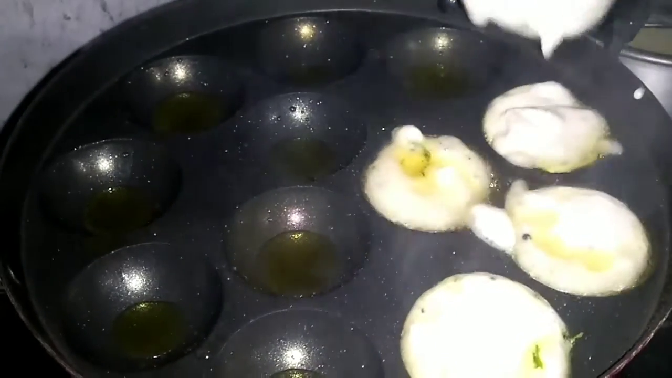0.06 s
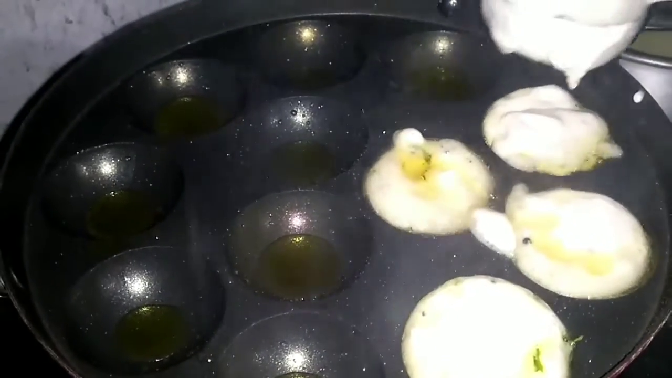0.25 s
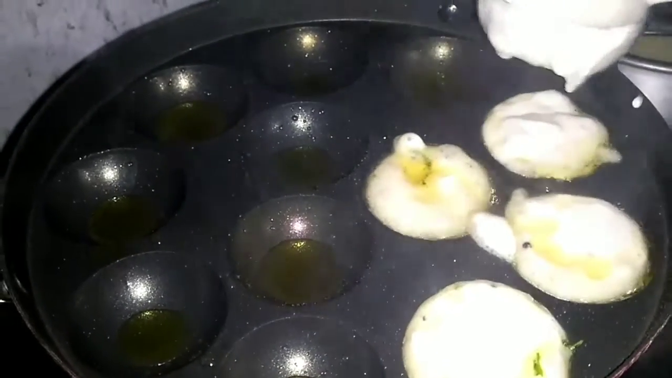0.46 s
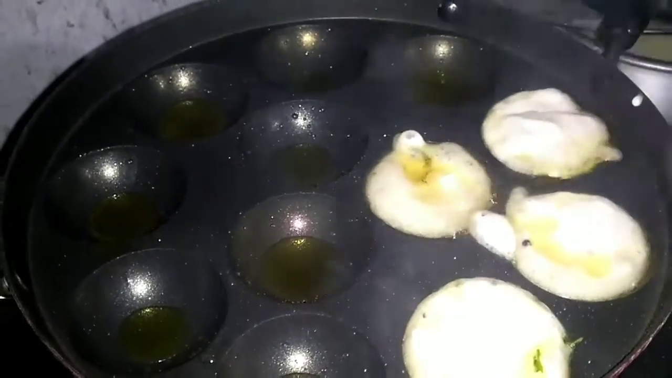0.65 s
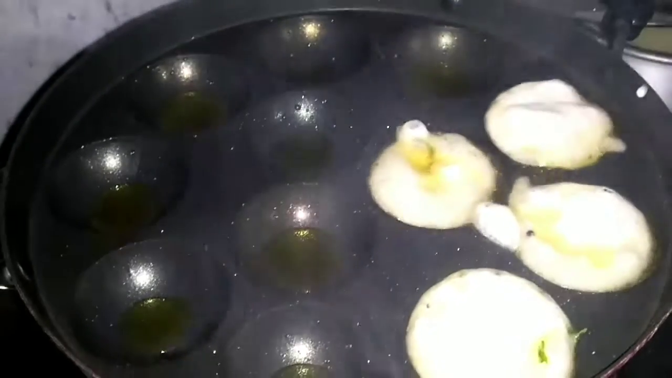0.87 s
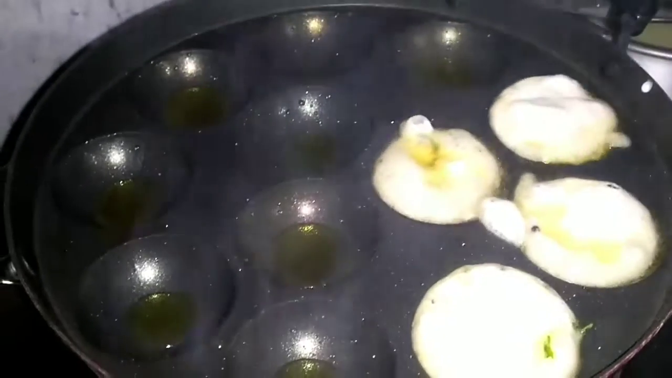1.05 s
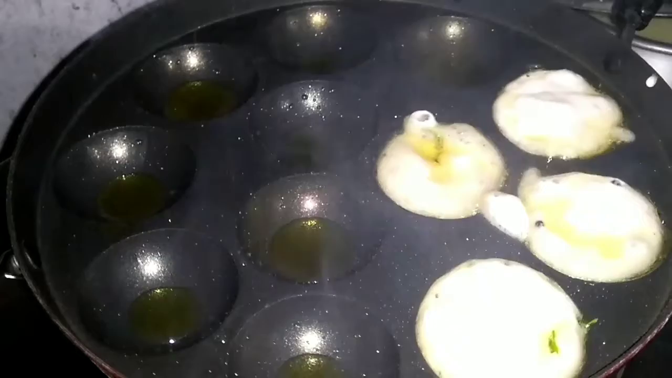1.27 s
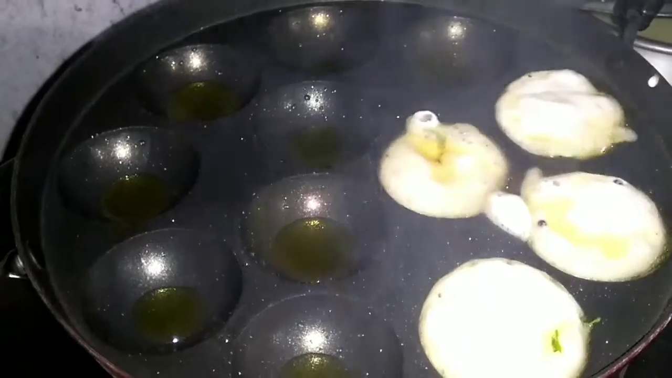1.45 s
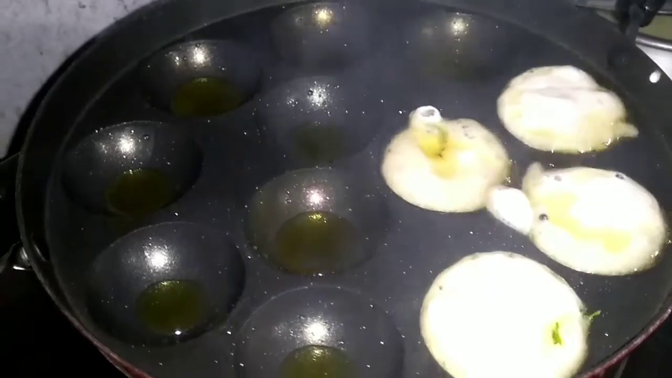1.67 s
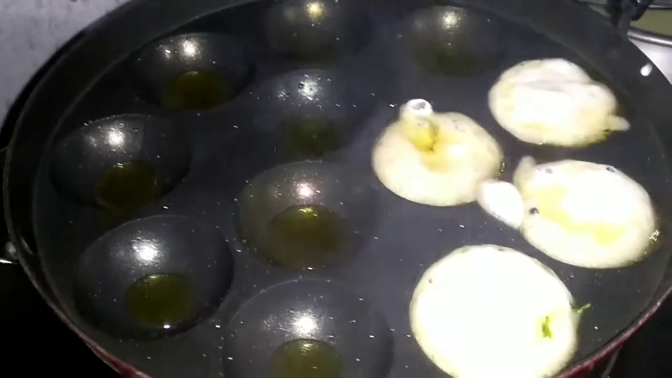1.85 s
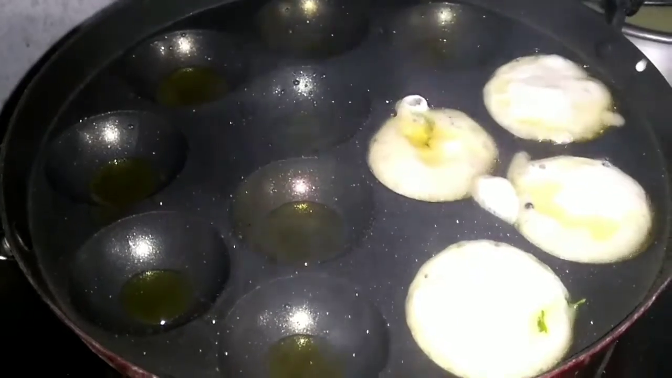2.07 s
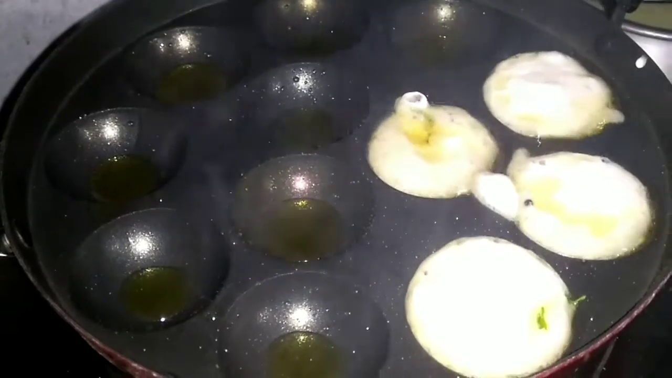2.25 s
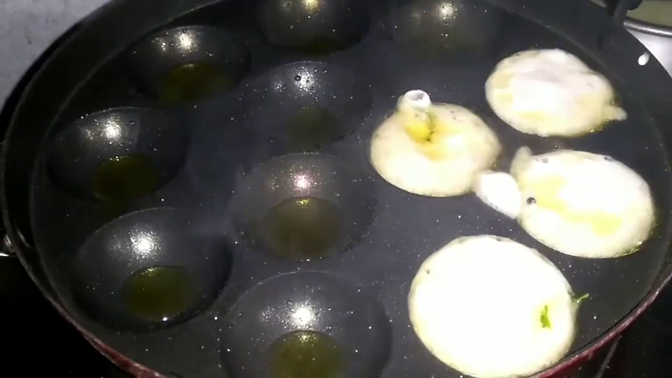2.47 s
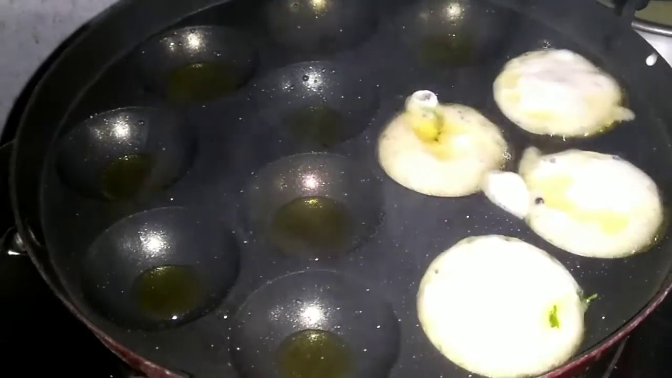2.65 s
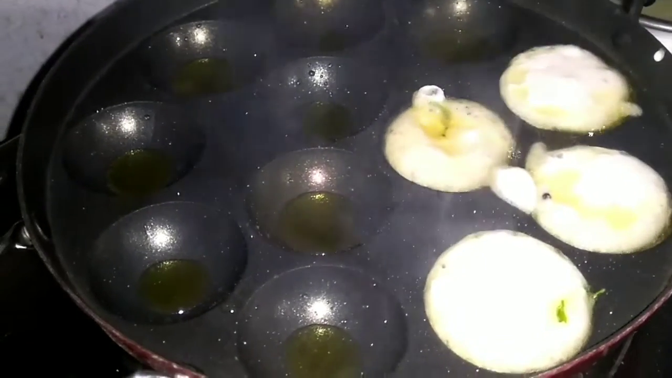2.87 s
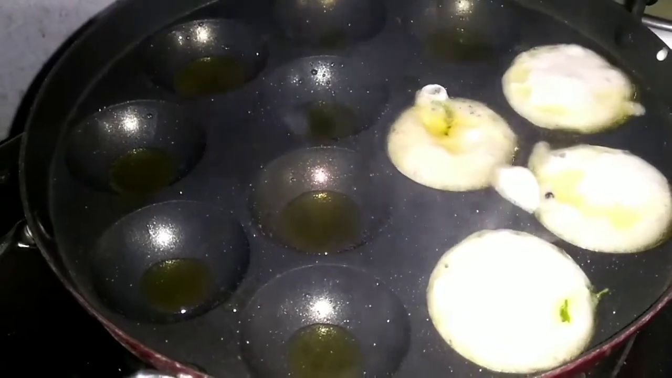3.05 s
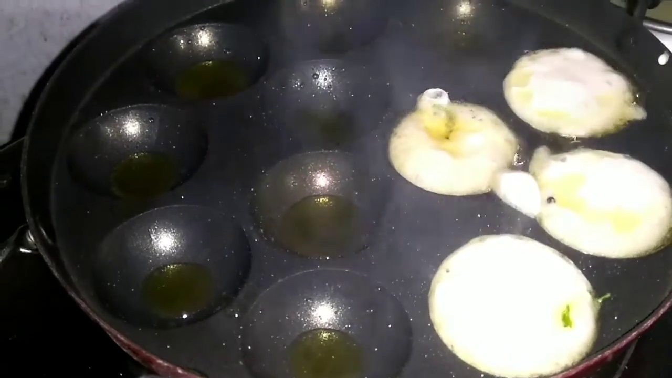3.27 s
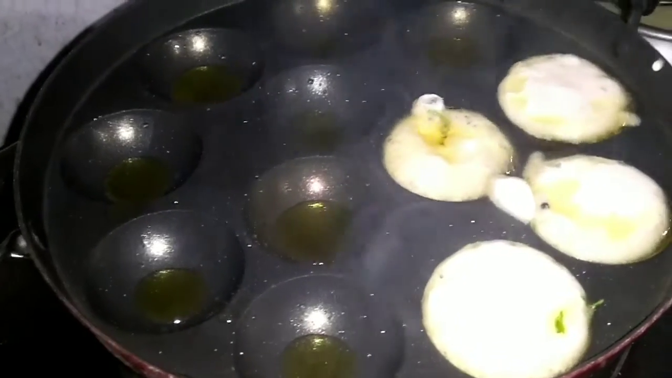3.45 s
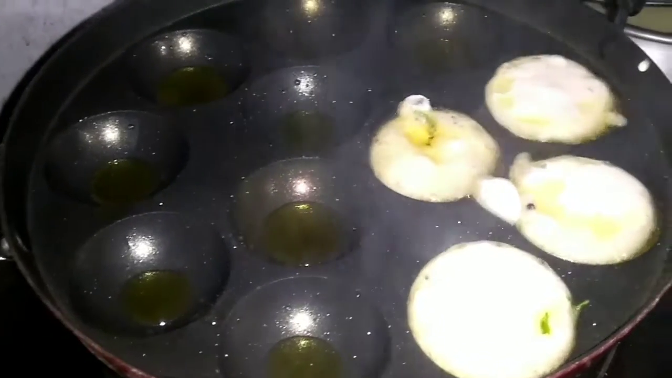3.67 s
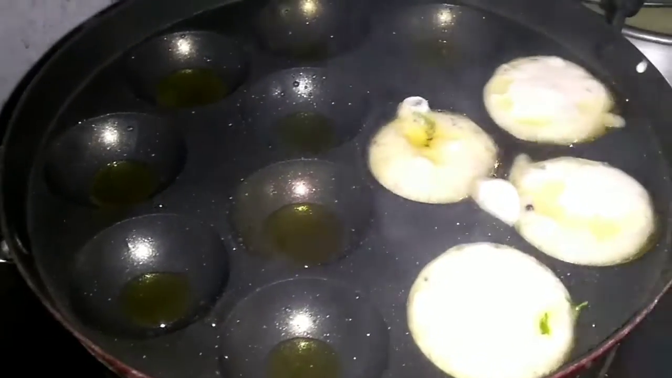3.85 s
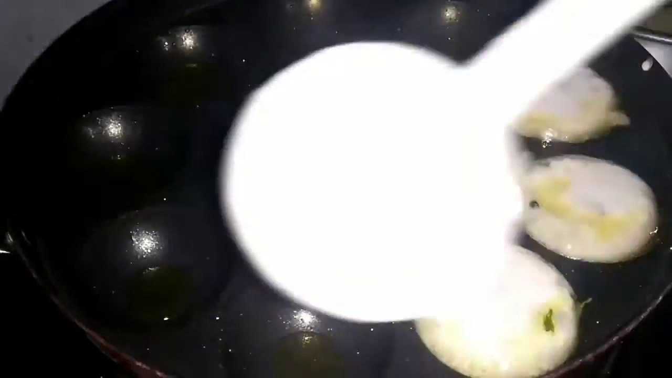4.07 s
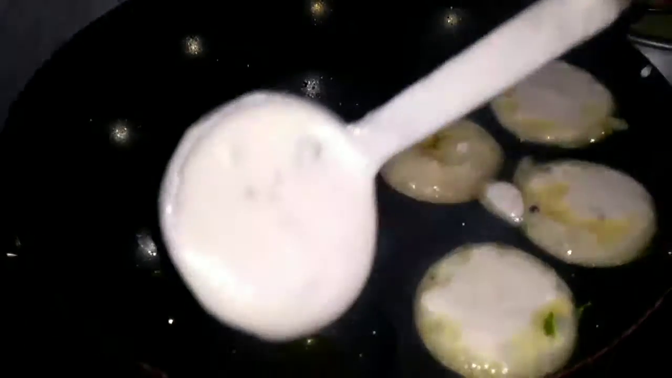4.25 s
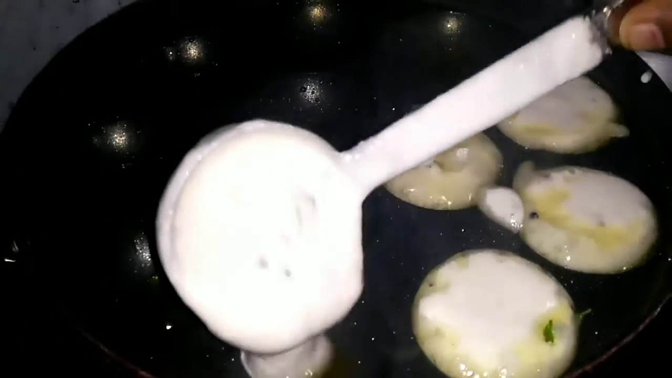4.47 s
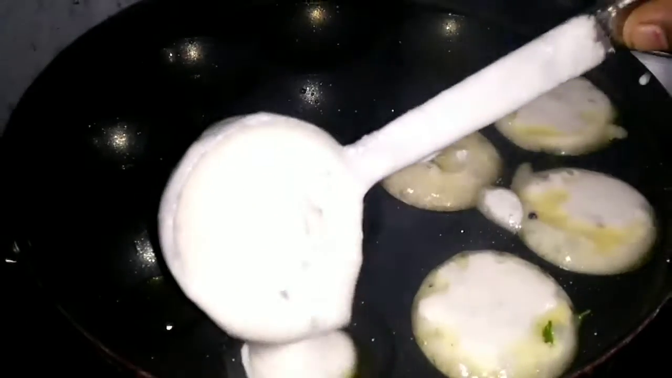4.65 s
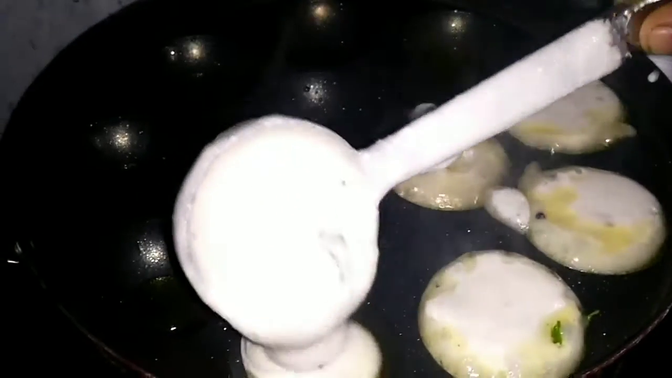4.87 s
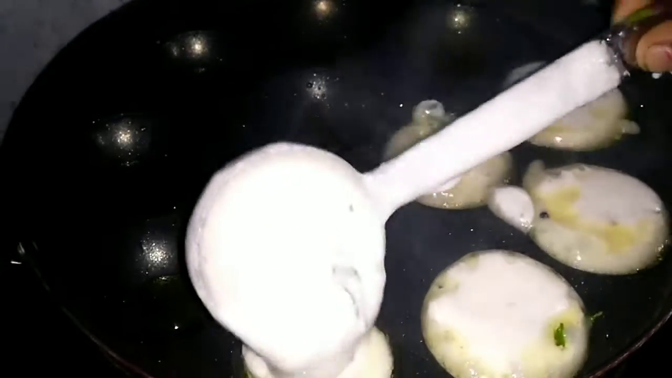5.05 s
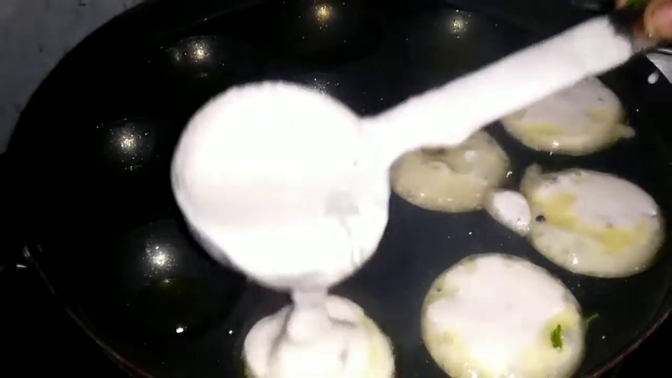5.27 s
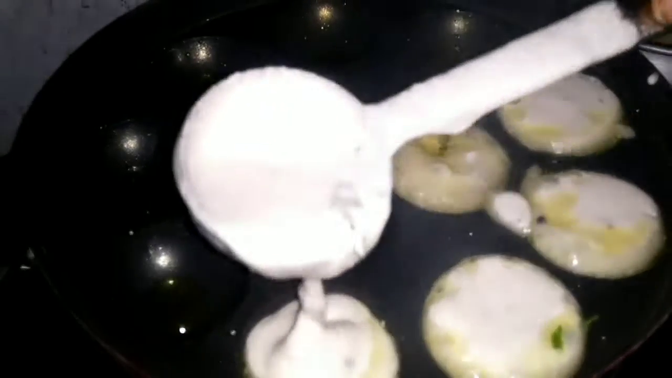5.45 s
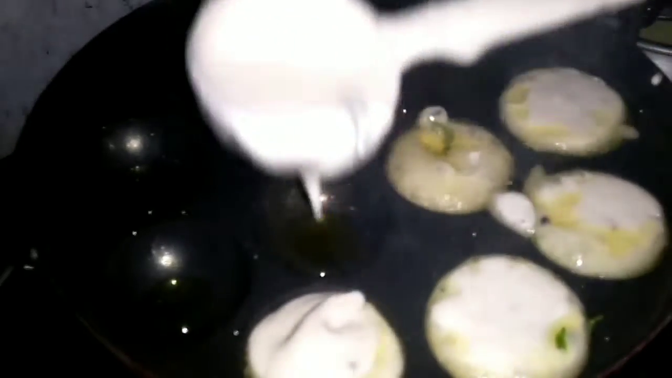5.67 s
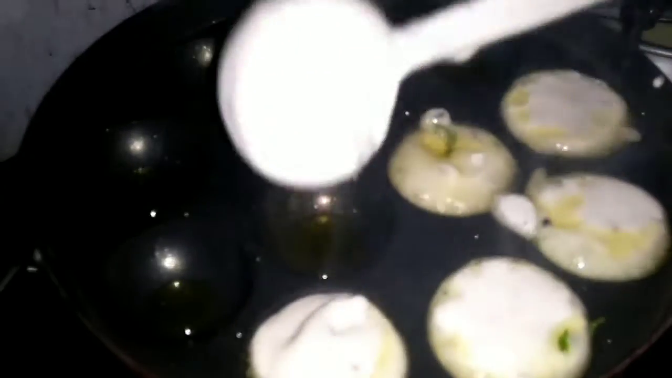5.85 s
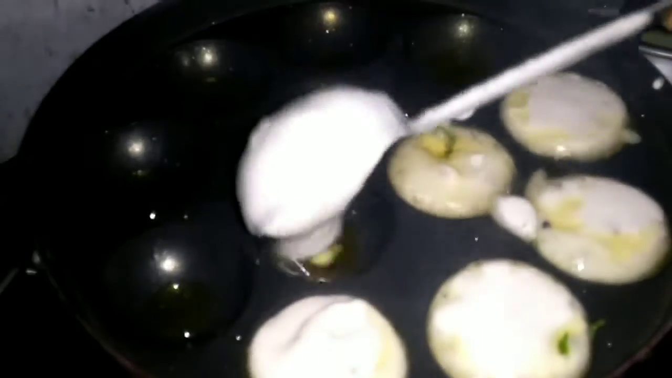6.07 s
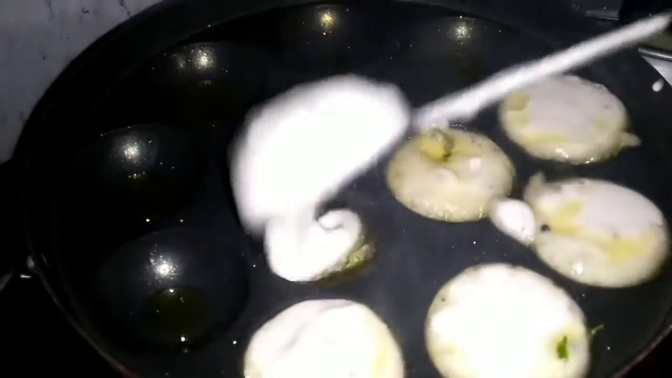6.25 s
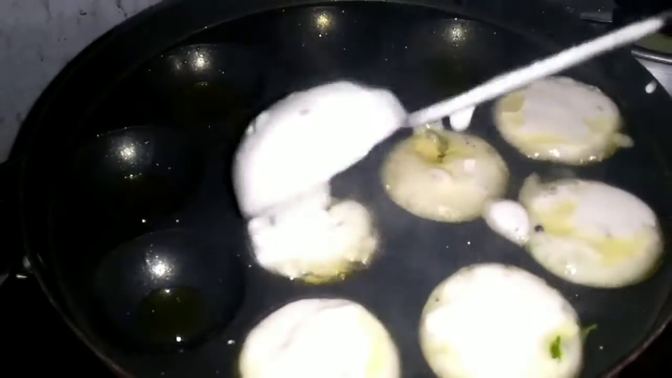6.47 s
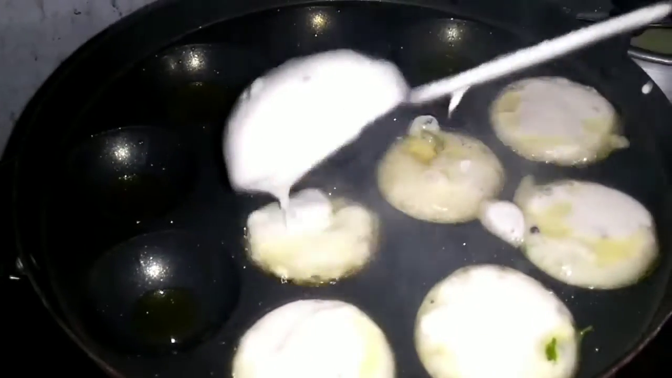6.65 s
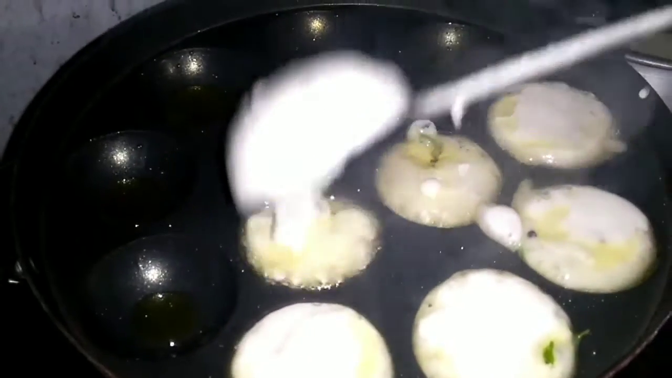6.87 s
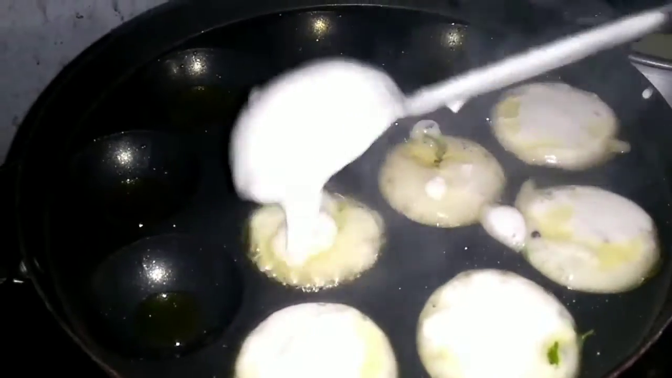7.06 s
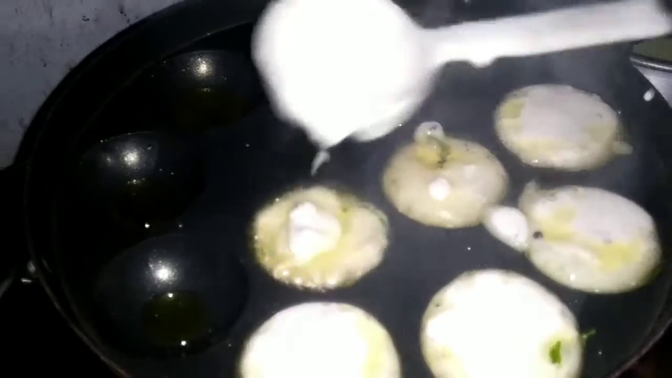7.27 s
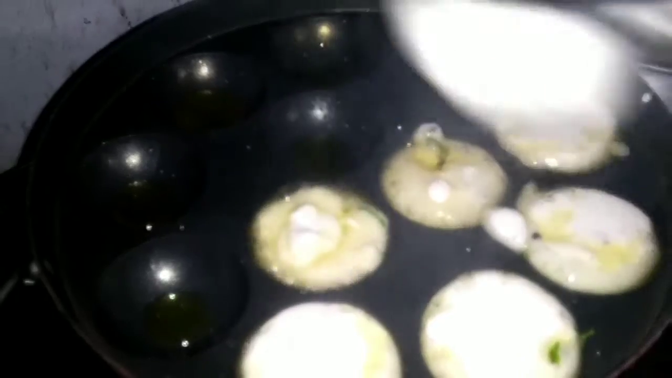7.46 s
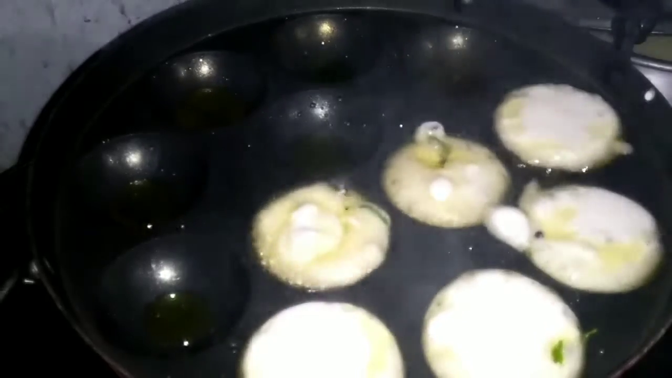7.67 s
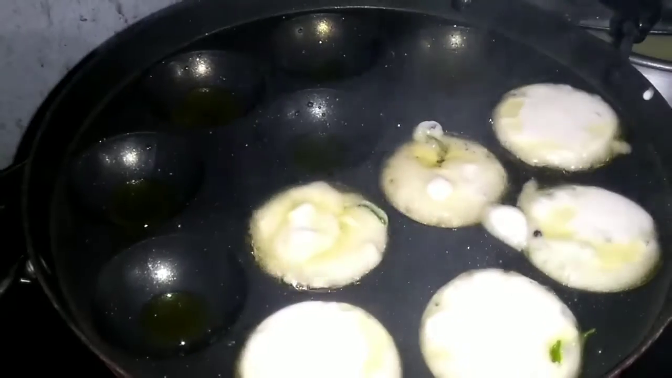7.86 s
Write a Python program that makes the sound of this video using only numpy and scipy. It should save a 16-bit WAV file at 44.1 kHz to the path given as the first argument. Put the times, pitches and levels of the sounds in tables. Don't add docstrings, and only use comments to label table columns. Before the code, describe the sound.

A close stereo scene in a small, hard-walled kitchen. From the start a thin, quiet sizzle simmers over a faint burner hum, dotted with fine spits and bright clicks. A dull, low bowl knock lands at 0.9 seconds, then a stronger cluster of thuds and shifting bumps from 1.7 to 2.1, with soft ladle drag. Another double knock comes near 2.55, just after a sharp flurry of pops at 2.4. From 3 to 4.8 only sparse spits and ticks stand out over weak frying. Around 4.92 and again at 5.17, the ladle chatters on the rim in short, damped metallic clacks, with a spit between. At 6.0 to 6.2 fresh batter hits oil: spits swell into a loud, bright, fluttering hiss with hard cracks, strongest from 6.25 to 7.2. It drops abruptly around 7.3 to a modest simmer, with one soft thud near 7.9.

```python
import sys
import numpy as np
from scipy import signal
from scipy.fft import rfft, irfft, next_fast_len
from scipy.io import wavfile
from scipy.ndimage import uniform_filter1d, map_coordinates

SR = 44100
rng = np.random.default_rng(int(sys.argv[2]) if len(sys.argv) > 2 else 0)


def generate_wav(signal):
    frames = np.transpose(np.atleast_2d(signal))
    scaled = np.clip(frames, -1, 1) * 32767
    pcm = np.round(scaled).astype(np.int16)
    wavfile.write(sys.argv[1], SR, pcm)


def invert_db(level):
    return 10 ** (np.asarray(level, dtype=float) / 20)


N = 349272
LAG = 10

# f/Hz, density/dB per Hz
FINE_STEAM = [(2000, -100), (5000, -46), (7000, -3), (8200, -2), (10400, 0), (12500, -2.5), (14400, -8.5),
              (15700, -2.5)]


def unit(x):
    return x / np.sqrt(np.mean(x ** 2) + 1e-20)


def along(points, hz):
    f, v = np.transpose(points)
    return np.interp(np.log(hz + 1), np.log(f + 1), v)


def wobble(rate):
    knots = rng.standard_normal(int(N * rate / SR) + 4)
    return map_coordinates(knots, [np.arange(N) * rate / SR])


def filtered(x, response):
    n = x.shape[-1]
    m = next_fast_len(n + 2048)
    hz = np.fft.rfftfreq(m, 1 / SR)
    return irfft(rfft(x, m) * response(hz), m)[..., :n]


def patchy(x, depth_db):
    z = signal.stft(x, nperseg=512)[2]
    field = rng.standard_normal(z.shape[1:])
    field = uniform_filter1d(uniform_filter1d(field, 8, 0), 6, 1)
    return signal.istft(z * invert_db(depth_db * unit(field)), nperseg=512)[1][:, :N]


def crackle(n, rate, spiky_db, haze):
    draw = rng.random((int(n * rate / SR) + 2, 4))
    at = (draw[:, 0] * n).astype(int)
    rank = np.minimum(-np.log(1 - draw[:, 1]), 5)
    size = invert_db(spiky_db * rank) * np.sign(draw[:, 2] - 0.5)
    lag = (2 * LAG * draw[:, 3]).astype(int)
    left = np.bincount(at + lag, size, n + 2 * LAG)[:n]
    right = np.bincount(at, size, n)
    bursts = unit(np.array([left, right]))
    return unit(bursts + haze * rng.standard_normal((2, n)))


def airy(spectrum):
    # f/Hz, left-right coherence
    alike = [(60, 0.99), (300, 1), (800, 0.97), (1300, 0.95), (2000, 0.55), (3000, 0.091)]

    def split(hz):
        angle = np.arccos(np.clip(along(alike, hz), -1, 1)) / 2
        return invert_db(along(spectrum, hz)) * [np.cos(angle), np.sin(angle)]

    mid, side = filtered(rng.standard_normal((2, N)), split)
    return unit(np.array([np.roll(mid + side, LAG), mid - side]))


def summed(*levels_db):
    return 10 * np.log10(sum(invert_db(db) ** 2 for db in levels_db) + 1e-12)


def surging(k):
    # t/s, fine level/dB, coarse level/dB, length/s
    surges = [(6.18, -2, 2, .012), (6.217, 3, -6.5, 0.012), (6.27, 0, 1.5, 0.016), (6.295, 4, 1.5, 0.014),
              (6.353, -4, -0.5, 0.013), (6.39, 2.5, 1, 0.038), (6.447, -2.5, -0.5, 0.025),
              (6.501, 1, -2.5, 0.023), (6.556, -2.5, -1, 0.019), (6.615, 2, 3.5, .02),
              (6.646, -1.5, 0, 0.0097), (6.709, -2, -2.5, 0.018), (6.749, 1, 3, 0.022),
              (6.813, 2, 3.5, 0.012), (6.85, 3, -1.5, 0.011), (6.934, 3.5, -2, 0.0078),
              (6.973, -3, 1, 0.015), (7.033, 0.5, 2, 0.034), (7.064, -2.5, -2, 0.014),
              (7.095, 1.5, 1, 0.018), (7.134, -1, 0, 0.0076), (7.183, 2.5, 2, 0.03), (7.24, -1, -1, 0.016)]
    t = np.arange(N) / SR
    return sum(row[1 + k] * np.exp(-((t - row[0]) / row[3]) ** 2) for row in surges)


def boiling():
    # t/s, level/dB
    simmer = [(0.0, -49), (1.19, -51.5), (1.54, -52), (1.98, -51), (2.27, -54.5), (2.6, -53), (2.76, -60.5),
              (3.24, -56), (4.01, -58.5), (4.28, -64), (4.41, -57), (4.87, -63), (5.01, -49.5),
              (5.25, -58.5), (5.84, -53.5), (6.0, -87), (7.3, -45), (7.92, -49.5)]
    # t/s, boiling time/s, fine level/dB, coarse level/dB
    pours = [
        (4.26, 0.6, -78, -54.5),
        (5.981, 0.99, -25.5, -34),
    ]
    spread_s, quench_s = (0.28, 0.26), (0.075, 0.16)
    first_db, last_db = (-59, -24), (-12.5, -12)
    wet_s, drying_db_per_s = 0.64, (4.5, 21)

    t = np.arange(N) / SR
    simmer_db = np.interp(t, *np.transpose(simmer))
    layers = [[simmer_db], [simmer_db - 5]]
    for s, hold, *peaks_db in pours:
        for k, db in enumerate(peaks_db):
            full = s + spread_s[k]
            sag_db = drying_db_per_s[k] * np.clip(t - full - wet_s, 0, None)
            times = [s, full, full + hold, full + hold + quench_s[k]]
            shape_db = np.interp(t, times, [first_db[k], 0, 0, last_db[k]], -99, -99)
            layers[k].append(db + shape_db - sag_db + surging(k))
    return summed(*layers[0]), summed(*layers[1])


def frying():
    # f/Hz, density/dB per Hz
    simmering = [(700, -13.5), (1100, -6.5), (1600, -8), (2200, -7), (3000, -1.5), (4200, 1.5), (5500, 0),
                 (7000, -3), (9000, -6.5)]
    # f/Hz, density/dB per Hz
    roaring = [(200, -95), (500, -50), (880, -32), (1000, -17.5), (1500, -12), (2200, -16), (3200, -7),
               (4500, -2.5), (6000, 0.5), (7200, -1.5), (9000, -18)]
    # f/Hz, width/Hz, level/dB
    pan_modes = [(1036, 43, 11.5), (1151.5, 26, 13), (1260, 38, 3.5), (1391, 28, 9), (1600, 38, 8.5),
                 (1790, 41, 11.5), (2033, 140, 7), (2233, 82, 8.5), (2406, 46, 10.5), (2640, 36, 11.5),
                 (2880, 28, 9), (3350, 140, 8.5), (4540, 80, -3), (4400, 150, 3)]

    fine_db, coarse_db = boiling()
    heat = np.clip((fine_db + 50.5) / 12, 0, 1)
    seethe_db = (1 - 0.9 * heat) * 1.1 * wobble(16) + (0.9 - 0.4 * heat) * wobble(60)
    fine = patchy(crackle(N, 7000, spiky_db=3.3, haze=1.2), 1.2)
    fine = unit(filtered(fine, lambda hz: invert_db(along(FINE_STEAM, hz))))
    bubbles = patchy(crackle(N, 2600, spiky_db=2.9, haze=1.0), 2.4)

    def through_pan(spectrum):
        def response(hz):
            rings_db = sum(db / (1 + ((hz - c) / w) ** 2 * 4) for c, w, db in pan_modes)
            return invert_db(along(spectrum, hz) + rings_db)
        return unit(filtered(bubbles, response))

    coarse = (1 - heat) * through_pan(simmering) + heat * through_pan(roaring)
    fine_flutter_db = 0.76 * (1 - 0.6 * heat) * wobble(30)
    coarse_flutter_db = 0.8 * (1 - 0.5 * heat) * wobble(25)
    hiss = invert_db(fine_db + 2.5 + seethe_db + fine_flutter_db) * fine
    return hiss + invert_db(coarse_db + 2.0 + seethe_db + coarse_flutter_db) * coarse


def stirring(idle_db):
    # t/s, length/s, peak level/dB
    strokes = [(-0.1, 0.54, -62), (0.623, 0.24, -62), (1.74, 0.19, -51), (1.843, 0.26, -52.5),
               (2.078, 0.11, -52), (2.357, 0.32, -61), (2.602, 0.26, -54.5), (3.998, 0.074, -64),
               (4.376, 0.27, -58.5), (4.514, 1.04, -56), (5.02, 0.11, -50), (5.17, 0.19, -42),
               (5.317, 0.48, -56.5), (5.682, 0.34, -56.5), (5.786, 1.56, -53.5), (7.04, 0.73, -57.5),
               (7.6, 0.4, -61)]
    t = np.arange(N) / SR
    power = invert_db(idle_db) ** 2
    for s, length, db in strokes:
        power = power + invert_db(db) ** 2 * np.sin(np.pi * np.clip((t - s) / length, 0, 1)) ** 2
    return 10 * np.log10(power)


def background():
    # f/Hz, density/dB per Hz
    hum = [(18, -50), (30, -30), (133, 7.5), (157, 8), (194, -7), (310, 5.5), (385, -13.5), (486, 4.5),
           (637, -25), (864, -49), (1020, 4), (1310, -41), (1910, -10), (2200, -3), (2860, -8.5),
           (4840, -120)]
    # f/Hz, density/dB per Hz
    drag_spectrum = [(110, -48), (180, -19), (318, -0.5), (441, -6.5), (482, -2), (699, 0), (858, -3),
                     (937, -10), (1500, -14), (1950, -4.5), (3300, -120)]
    # f/Hz, density/dB per Hz
    counter = [(20, -70), (40, -55), (55, -16), (120, -14.5), (170, -47), (400, -120)]

    idle_db = -66.5
    drag_db = stirring(idle_db)
    rumble_db = -81.5 + 0.31 * np.minimum(drag_db - idle_db, 20)
    lumps_db = 1.4 * wobble(22)
    drag = invert_db(drag_db - 5.5 + lumps_db) * patchy(airy(drag_spectrum), 2.2)
    rumble = invert_db(rumble_db + 3.0 + 2.1 * wobble(11.0)) * airy(counter)
    return invert_db(-68.5) * patchy(airy(hum), 2.4) + drag + rumble


def ring(modes, t, attack, spread):
    tones = 0
    for hz, db, t60 in modes:
        level_db = db + rng.normal(0, 1.3 * spread) - 60 * t / t60
        pitch = hz * rng.normal(1, 0.012 * spread)
        tones = tones + invert_db(level_db) * np.sin(2 * np.pi * pitch * t)
    return tones * (1 - np.exp(-t / attack))


def knocks():
    # t/s, peak level/dB, f/Hz, t60/s,
    # overtone level/dB
    thuds = [(0.024, -51, 303, 0.13, -1), (0.904, -18.5, 275, 0.04, -22), (0.917, -22.5, 278, 0.032, -25),
             (1.69, -27, 265, 0.079, -5), (1.7221, -16, 301, 0.024, -30), (1.801, -40, 274, 0.11, -9),
             (1.962, -41, 755, 0.057, -15), (1.97, -38, 548, 0.057, 0), (1.975, -42, 727, 0.034, -12),
             (2.009, -36.5, 695, 0.03, -15), (1.795, -41, 702, 0.057, -19), (1.84, -52, 295, 0.11, -15),
             (1.88, -50, 300, 0.14, -15), (1.86, -57, 677, 0.14, -19), (1.99, -44, 318, 0.094, -15),
             (2.114, -37, 296, 0.063, -14), (2.129, -43.5, 641, 0.081, -21), (2.418, -44, 695, 0.032, -17),
             (2.538, -23, 267, 0.064, 1), (2.571, -26.5, 242, 0.055, -14), (2.604, -35.5, 463, 0.069, -34),
             (2.619, -41, 496, 0.076, -26), (3.95, -41, 1150, 0.025, -30), (4.048, -50.5, 307.6, 0.32, -1),
             (4.12, -48, 277, 0.11, -21), (4.639, -53.5, 660, 0.3, -15), (5.328, -32, 320, 0.072, -16),
             (5.999, -37, 1142, 0.14, -23), (6.059, -43, 1114, 0.14, -23), (6.997, -47, 357, 0.15, -7),
             (7.884, -33, 235, 0.06, -19)]
    # t/s, peak level/dB, f/Hz
    bumps = [
        (1.728, -37.5, 156),
        (1.759, -38, 56.5),
        (1.789, -32.5, 78.5),
        (1.819, -59, 61.9),
        (2.59, -35, 161),
        (4.595, -47, 145),
        (4.738, -49, 118),
        (5.211, -36, 128),
    ]
    # ratio to f, level/dB, t60/s
    wall = [(1.9, 12, 0.02), (2.5, 1, 0.024), (3.4, 0, 0.012)]

    out, t = np.zeros(N + SR), np.arange(SR // 4) / SR
    for s, db, hz, t60, over_db in [*thuds, *[(*row, 0.094, -19) for row in bumps]]:
        modes = [(hz, 0, t60), (hz * 1.3, -6, t60), (hz * 0.85, -7, t60)]
        over_db = min(over_db, 3 - hz / 70)
        modes += [(hz * k, over_db + level, life) for k, level, life in wall]
        out[round(s * SR):][:len(t)] += invert_db(db - 0.5) * ring(modes, t, 2.2 / hz, spread=0.4)
    return out[:N]


def raps():
    # t/s, peak level/dB, ringing time/s, overtone level/dB, chatter share
    bounces = [(4.914, -46, 0.01, 6, .5), (4.9235, -19, 0.022, 5.5, 0.11), (4.936, -29.5, 0.008, -3, 0.17),
               (4.946, -22, 0.003, -6, 0.37), (4.957, -29.5, 0.0092, -6, 0.9),
               (4.971, -28.5, 0.011, -2, 0.9), (4.985, -37, 0.017, -4, 0.97), (5.005, -38.5, 0.016, -10, 1),
               (5.025, -44, 0.015, -9, 0.8), (5.1714, -22.5, 0.019, -3, 0.052),
               (5.181, -22.5, 0.006, 6, .1), (5.194, -29, 0.0039, 4, 0.36), (5.204, -40, 0.0099, -1, .8),
               (5.214, -33, 0.0081, 4, 0.93), (5.232, -34, 0.012, -2, 0.6), (5.248, -35, 0.018, -16, 0.37),
               (5.271, -49, 0.013, -9, 0.65), (5.295, -49, 0.025, -9, 0.54)]
    # f/Hz, level/dB, t60/s
    rim = [(272, -2, 0.077), (455, -7.5, 0.094), (565, -11.5, 0.09), (711, -3, 0.077), (813, 3, 0.079),
           (1001, 5.5, 0.077), (1150, -12, 0.08), (1230, -24, 0.073), (1553, -6, 0.074), (1680, -12, 0.091),
           (2030, -0.5, 0.083), (2360, -7.5, 0.047), (3170, -24, 0.054), (4180, -30, 0.045)]

    out, t = np.zeros(N + SR), np.arange(SR // 10) / SR
    for s, db, rings, over_db, chatter in bounces:
        contact = 0.16 * chatter * np.exp(-t / 0.014) * rng.standard_normal(len(t))
        contact[0] = 1
        modes = [(hz, level + over_db * (hz > 1200), t60) for hz, level, t60 in rim]
        clack = signal.fftconvolve(contact / np.linalg.norm(contact), ring(modes, t, 0.0009, spread=0.2))
        clack = clack[:len(t)] / np.abs(clack).max()
        scrape = filtered(rng.standard_normal(len(t)), lambda f: f / 600 / (1 + (f / 1300) ** 3))
        scuff = invert_db(-12 - 60 * t / 0.1) * unit(scrape)
        damped = np.exp(-np.clip(t - rings, 0, None) / 0.003)
        out[round(s * SR):][:len(t)] += invert_db(db - 6.0) * (3 * clack + scuff) * damped
    return filtered(out[:N], lambda hz: 1 / (1 + (150 / (hz + 1)) ** 4))


def kitchen(x):
    # f/Hz, t60/s
    decay = [(150, 0.29), (1000, 0.13), (4000, 0.28), (12000, 0.15)]
    hz, t, z = signal.stft(airy([(100, 0)])[:, :SR // 2], SR, nperseg=256)
    fading = invert_db(-60 * t / along(decay, hz)[:, None])
    tail = signal.istft(z * fading, SR, nperseg=256)[1]
    late = np.pad(x, (400, 0))[None]
    return signal.fftconvolve(late, tail / np.linalg.norm(tail[0]), axes=1)[:, :N]


def spits():
    # t/s, peak level/dB, centre f/Hz, length/s
    left_cups = [(0.598, -35, 9720, 0.025), (0.803, -41.5, 3180, 0.022), (1.168, -39, 4450, 0.013),
                 (1.677, -34.5, 8500, 0.01), (2.167, -38.5, 8800, 0.03), (2.347, -42.5, 2740, 0.021),
                 (2.444, -24.5, 2920, 0.0045), (2.614, -43, 10900, 0.11), (2.758, -43, 2740, 0.028),
                 (2.916, -40, 3920, 0.035), (3.125, -42, 3350, 0.014), (3.436, -39, 11400, 0.015),
                 (3.519, -36.5, 8350, 0.032), (3.576, -38.5, 9800, 0.017), (3.828, -36, 8400, 0.015),
                 (3.836, -38, 4400, 0.011), (3.897, -35, 4400, 0.019), (4.376, -43, 4480, 0.097),
                 (5.244, -41, 1990, 0.095), (5.519, -37, 5800, 0.022), (5.968, -23, 12700, 0.017)]
    # t/s, peak level/dB, centre f/Hz, length/s
    middle_cups = [(0.05, -39, 3880, 0.029), (0.196, -35.5, 9860, 0.043), (0.272, -35.5, 11600, 0.027),
                   (0.493, -43, 9740, 0.092), (0.714, -40.5, 2600, 0.04), (1.055, -34.5, 9000, 0.064),
                   (1.253, -34, 9100, 0.041), (1.847, -45.5, 2500, 0.2), (2.315, -41, 4600, 0.012),
                   (2.411, -40, 2500, 0.031), (2.536, -33.5, 10600, 0.015), (2.659, -47.5, 2740, 0.19),
                   (2.725, -40, 10500, 0.027), (3.009, -42, 12200, 0.025), (3.396, -46.5, 2960, 0.1),
                   (3.709, -38, 4040, 0.03), (3.944, -33, 12500, 0.0076), (4.232, -37.5, 5530, 0.02),
                   (4.285, -40.5, 11500, 0.022), (4.331, -40, 10300, 0.0099), (4.593, -36.5, 3560, 0.023),
                   (4.643, -37.5, 2880, 0.032), (4.723, -40, 2460, 0.034), (4.772, -40, 2300, 0.031),
                   (4.929, -30.5, 2450, 0.083), (4.899, -41, 5150, 0.089), (4.786, -47, 8850, 0.027),
                   (4.986, -27, 10400, 0.043), (4.987, -25, 13900, 0.038), (5.971, -37, 2300, 0.057)]
    # t/s, peak level/dB, centre f/Hz, length/s
    right_cups = [(2.413, -39, 10000, 0.01), (2.422, -57, 10500, 0.03), (2.448, -30.5, 10000, 0.013),
                  (2.474, -45, 9840, 0.027), (3.039, -34, 6300, 0.02), (3.278, -28.5, 13700, 0.0069),
                  (4.173, -30, 12500, 0.0077), (4.219, -35.5, 12700, 0.0089), (4.531, -35, 14800, 0.025),
                  (4.999, -37.5, 5800, 0.11), (5.199, -31, 3580, 0.022), (5.425, -48, 2320, 0.27),
                  (5.803, -60, 10200, 0.017), (5.844, -43.5, 2680, 0.12), (5.918, -44, 12700, 0.14),
                  (6.055, -35.5, 2130, 0.059), (6.118, -41, 8600, 0.023), (6.151, -23, 3900, 0.012),
                  (6.155, -22.5, 4130, 0.018), (6.11, -39, 10000, 0.0067), (6.153, -36, 10400, 0.013),
                  (6.186, -23.5, 9300, 0.022), (6.228, -23, 9000, 0.023), (6.224, -28, 4000, .02),
                  (6.635, -23, 4460, 0.1), (6.801, -24.5, 3830, 0.025)]
    cups = [(left_cups, 5.5), (middle_cups, 4), (right_cups, -1.5)]

    out, t = np.zeros((2, N + SR)), np.arange(SR // 4) / SR
    for rows, pan_db in cups:
        ports = invert_db(pan_db * np.array([[0.5], [-0.5]]))
        for s, db, hz, length in rows:
            octaves = max(0.99 - 0.1 * (db + 41), 0.3)

            def sizes(f):
                peak = np.exp(-(np.log2((f + 1) / hz) / octaves) ** 2)
                return (f > 1200) * (0.37 * np.minimum(f / hz, 1) ** 0.5 + peak)

            puff = unit(filtered(crackle(len(t), 2200, spiky_db=2.7, haze=0.8), sizes))
            rise = 1 - np.exp(-t * hz / 9)
            shape = rise * np.exp(-(t / max(length, 0.005)) ** 1.12)
            out[:, round(s * SR):][:, :len(t)] += invert_db(db - 6.5) * ports * shape * puff
    return out[:, :N]


def pops():
    # t/s, peak level/dB, left-right level/dB, centre f/Hz
    drops = [(0.4696, -30, -5, 9740), (1.056, -28, -6.0, 9930), (1.071, -29, -5.0, 8110),
             (1.1494, -29, -4.0, 11600), (1.1854, -28, -3.0, 12500), (1.2445, -28, -8, 11700),
             (1.251, -29, -4.0, 8840), (1.2714, -30, -4, 11000), (1.671, -31, -1.0, 8180),
             (2.411, -27, -11, 8230), (2.4192, -25, -24, 10300), (2.4228, -19.5, -19, 11600),
             (2.4447, -19, -18, 11200), (2.452, -24, -14.5, 11700), (2.4554, -27, -13, 11500),
             (2.4766, -26, -16, 9840), (2.4954, -28, -10, 11100), (3.0435, -29, 1.5, 8000),
             (3.2745, -28, -6.5, 14000), (3.28, -32, -5, 13000), (3.284, -31, -5, 13000),
             (3.465, -36, -6, 11700), (3.5109, -45, -3.0, 8240), (3.6516, -30.5, -3.0, 10700),
             (3.709, -32, -8, 11400), (3.7564, -37, -1.5, 10100), (3.8312, -39, -6.5, 8600),
             (3.8974, -38, -6.0, 7800), (3.942, -26, 4, 12600), (4.172, -32, -11.0, 9550),
             (4.1769, -29, -11, 12400), (4.1884, -38, 13, 13500), (4.2158, -30, -8, 12600),
             (4.2826, -33, -7, 12040), (4.338, -36, 1, 10400), (4.5341, -28, -9.5, 14600),
             (4.7877, -32, -10, 9150), (4.9292, -24.5, -8, 9240), (4.9871, -34, -2.0, 11900),
             (5.2363, -29, -4, 7700), (5.669, -31, -6, 11800), (5.8491, -35, -9, 10700),
             (5.9209, -35, -8, 12200), (5.9409, -31, -12, 15500), (5.965, -25, -16, 10500),
             (5.9718, -29, -8, 11900), (6.0561, -34, -13, 10900), (6.106, -27, -12, 9290),
             (6.122, -17, -15, 14500), (6.1549, -24, -6.5, 9070)]
    # t/s, peak level/dB, left-right level/dB, centre f/Hz
    cracks = [(6.201, -17, -6, 8560), (6.2445, -7.5, -4, 9000), (6.2855, -21, -3, 10900),
              (6.356, -12, -3, 11500), (6.513, -19, -3, 10000), (6.614, -15, -3, 10000),
              (6.798, -5.5, -3, 8540), (6.85, -9, -5, 9500), (7.003, -11, -5, 10000),
              (7.088, -10, -4, 10500), (7.1495, -12, -9, 11300), (7.175, -10, -6, 10000)]

    out, impulse = np.zeros((2, N + SR)), np.eye(1, 256, 128)[0]
    fade = np.exp(-abs(np.arange(-128, 128)) / 25)
    steam = lambda f: invert_db(along(FINE_STEAM, f))
    for s, db, pan_db, hz in [*drops, *cracks]:
        colour = lambda f: steam(f) * (0.29 + np.exp(-(np.log2((f + 1) / hz) / 0.35) ** 2))
        click = filtered(impulse, colour)
        fizz = fade * filtered(rng.standard_normal(256), steam)
        click = click / np.abs(click).max() + 0.3 * fizz
        for port, lag in enumerate((LAG, 0)):
            start = round(s * SR) + lag - 110
            out[port, start:][:256] += invert_db(db + 0.5 + pan_db * (0.5 - port)) * click
    return out[:, :N]


def scene():
    hits = knocks() + raps()
    direct = np.array([np.roll(hits, LAG), hits])
    return frying() + background() + direct + invert_db(-8.5) * kitchen(hits) + spits() + pops()


def low_pass(x):
    return signal.sosfilt(signal.butter(12, 16480, fs=SR, output="sos"), x)


def record(dry):
    # f/Hz, left-right level/dB
    port_colour = [(60, 2), (110, -2.5), (200, 1), (380, 0.5), (700, -1.5), (1290, -0.5), (2380, 6.5),
                   (4400, 9), (8120, -2.5), (15000, -6.5)]

    def port(hz):
        dip_db = -6.5 * np.exp(-((hz - 6890) / 630) ** 2)
        pan_db = along(port_colour, hz) * np.array([[0.5], [-0.5]])
        return invert_db(dip_db + pan_db - 62 * (hz > 15850))

    return low_pass(filtered(dry, port))


dry = scene()
out = record(dry)
generate_wav(out)
```